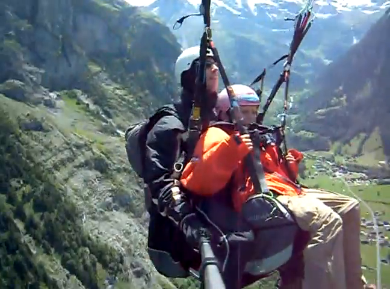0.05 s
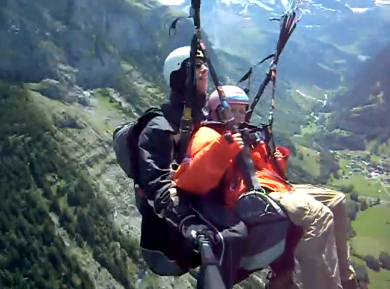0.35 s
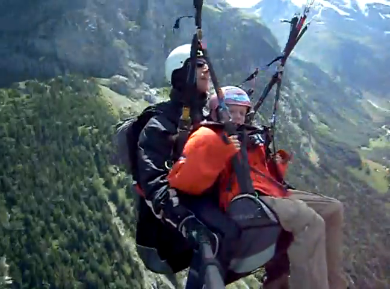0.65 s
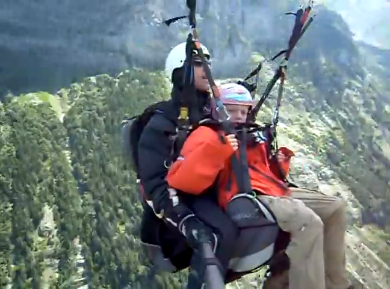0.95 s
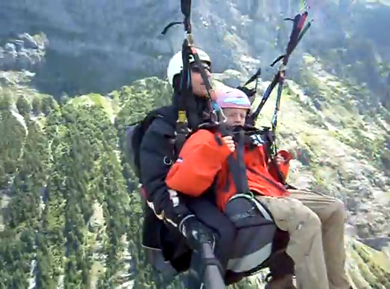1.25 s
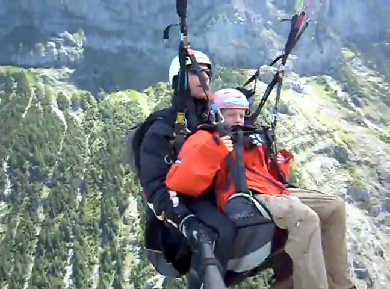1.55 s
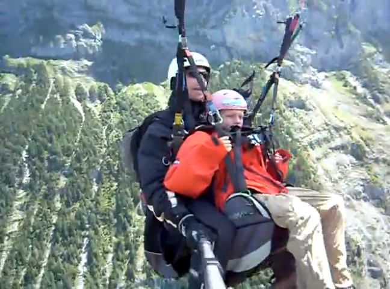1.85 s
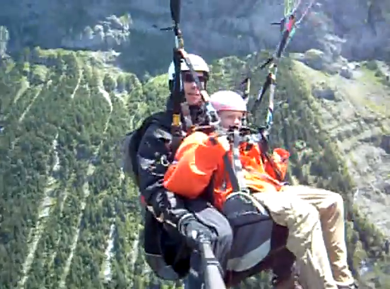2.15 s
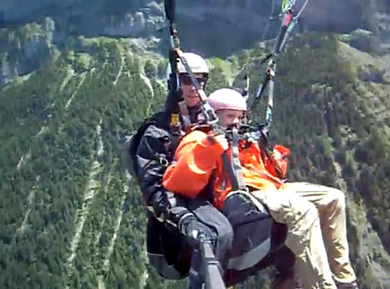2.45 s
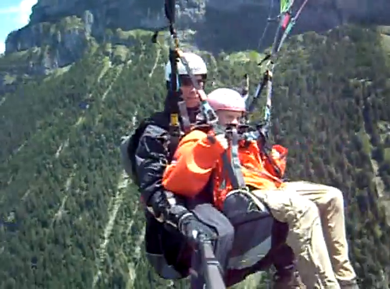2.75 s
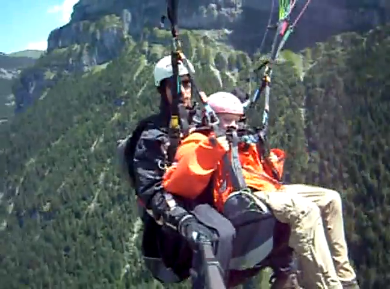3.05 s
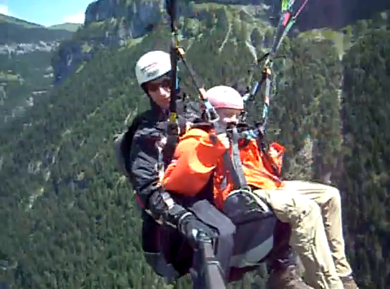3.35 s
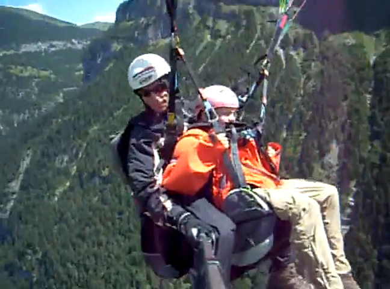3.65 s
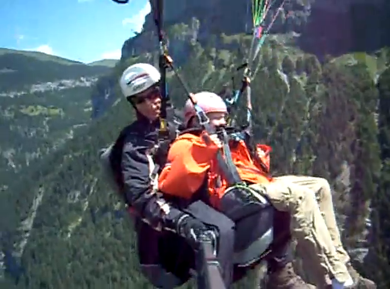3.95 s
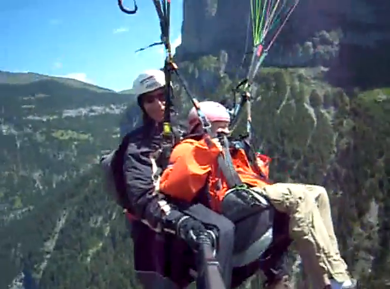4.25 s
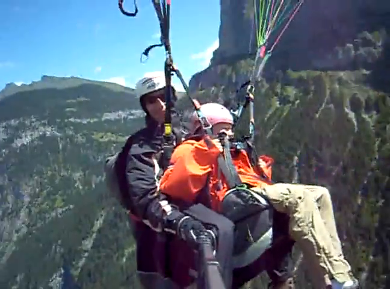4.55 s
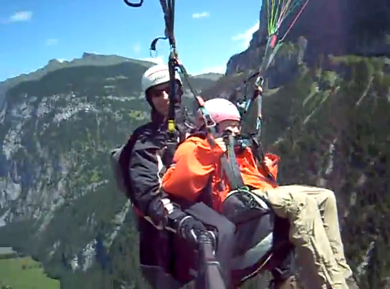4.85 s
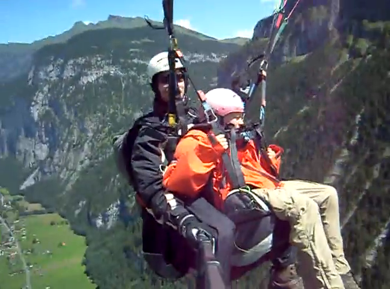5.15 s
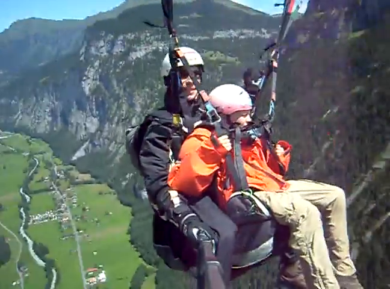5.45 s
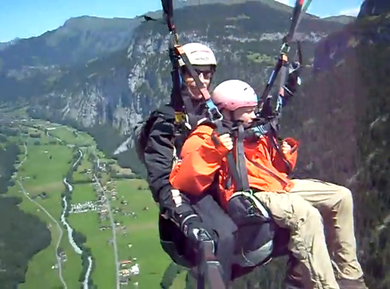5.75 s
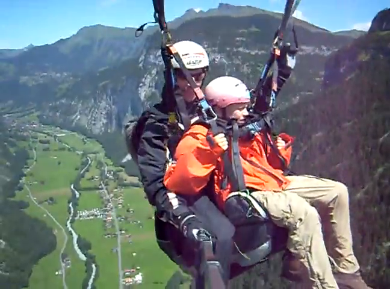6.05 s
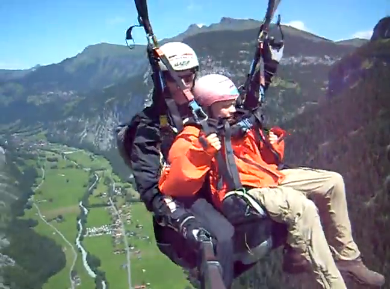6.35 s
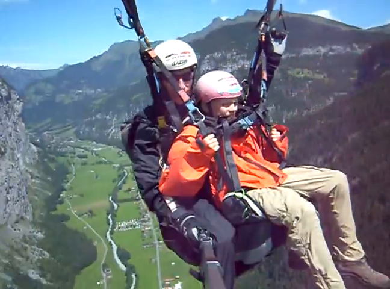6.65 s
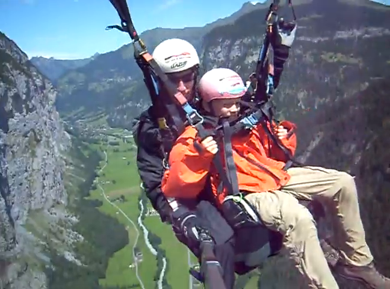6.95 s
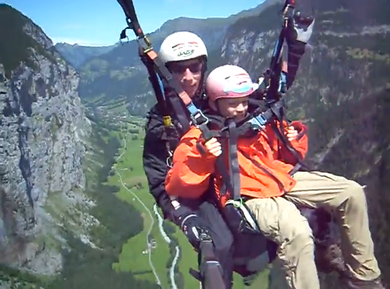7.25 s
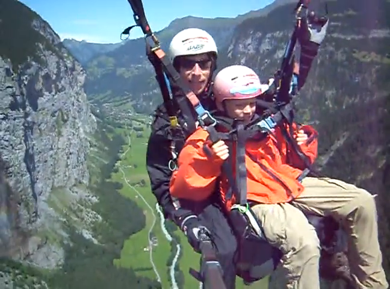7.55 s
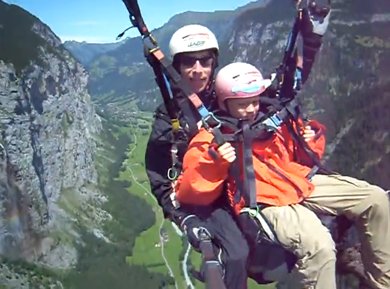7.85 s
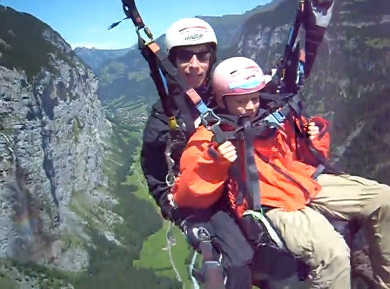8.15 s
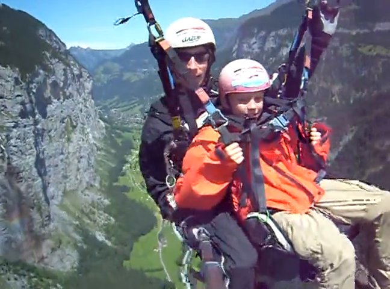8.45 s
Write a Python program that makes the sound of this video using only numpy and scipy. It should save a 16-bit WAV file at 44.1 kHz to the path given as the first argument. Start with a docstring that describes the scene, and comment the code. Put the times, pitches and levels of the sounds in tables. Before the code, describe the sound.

Low wind buffets a microphone held out on a pole from a paraglider high over a valley. Air rushes over cloth and harness, with a faint airy whistle from the lines and a few soft thuds. Midway, one strong gust roars, cracking and spitting on the microphone. The wind then drops, and short rough puffs hit the microphone, thickest near the end.

```python
"""Low wind buffets a camera microphone, held out on a pole from a paraglider swinging through turns.
Air rushes over cloth and harness; lines and pole shed vortices and sing faintly with the airspeed.
Midway one long gust roars, cracking and spitting at the microphone port.
Single eddies hit the port as short, rough puffs, most often in the slower air afterwards."""
import sys
import numpy as np
from scipy.fft import rfft, irfft, next_fast_len
from scipy.io import wavfile
from scipy.ndimage import map_coordinates

SR = 44100
rng = np.random.default_rng(int(sys.argv[2]) if len(sys.argv) > 2 else 0)


def master(y):
    """Save y as 16-bit WAV."""
    cut = np.clip(np.atleast_2d(y).T, -1, 1)
    pcm = np.round(cut * 32767)  # scale
    wavfile.write(sys.argv[1], SR, pcm.astype(np.int16))


N = 378819
TIME = np.arange(N) / SR
CRUISE_M_PER_S = 10

# glider gains speed in the turn, then slows: time_s, speed_m_per_s
AIRSPEED = [(0, 9.3), (.6, 10.37), (1.6, 10.42), (2.5, 10.57), (3.3, 9.8), (3.9, 9.7), (5.3, 9.16),
            (6.2, 8.2), (6.8, 8.05), (7.5, 7.27), (8.59, 7.1)]


def amp(db):
    """Decibels to gain."""
    return 10 ** (np.asarray(db) / 20)


def unit(x):
    """Scale to rms 1."""
    return x / np.sqrt(np.mean(x ** 2) + 1e-20)


def curves(rows):
    """One value per sample for each column after time_s."""
    time_s, *columns = np.transpose(rows)
    return [np.interp(TIME, time_s, column) for column in columns]


def swell(middle_s, half_s):
    """Bell in time, peak 1."""
    return np.exp(-((TIME - middle_s) / half_s) ** 2)


def wobble(rate_hz):
    """Smooth, bounded random curve through knots at rate_hz."""
    knots = np.clip(rng.standard_normal(int(N * rate_hz / SR) + 4), -2, 2)
    return map_coordinates(knots, [TIME * rate_hz])


def filtered(x, response):
    """x through a gain given as a function of frequency."""
    size = next_fast_len(N + 8192)
    return irfft(rfft(x, size) * response(np.fft.rfftfreq(size, 1 / SR)), size)[:N]


def coloured(x, spectrum):
    """x through a spectrum of rows freq_hz, gain_db."""
    freq_hz, gain_db = np.transpose(spectrum)
    return filtered(x, lambda f: amp(np.interp(np.log(f + 1), np.log(freq_hz), gain_db)))


def noise(spectrum):
    """Coloured noise, rms 1."""
    return unit(coloured(rng.standard_normal(N), spectrum))


def crackle(spectrum, rate_hz, spread_db):
    """Coloured pressure jumps of uneven size at random moments, rms 1."""
    size = amp(spread_db * np.minimum(rng.standard_normal(N), 2)) * rng.choice([-1, 1], N)
    jumps = size * (rng.random(N) < rate_hz / SR)
    return unit(coloured(jumps, spectrum))


def flow():
    """Buffet and turbulence at the port in dB; both sink in a lull."""
    # airflow strength: time_s, buffet_db, turbulence_db
    strength = [(0, -32.5, -36), (1.0, -32.5, -32), (1.8, -26, -31.5), (2.55, -27, -30.5),
                (3.15, -28.5, -34.5), (3.8, -28, -33.5), (4.2, -25.5, -22.5), (4.45, -26.5, -14),
                (4.7, -27.5, -15), (5.0, -24.5, -22.5), (5.33, -26.5, -30.5), (5.44, -33.5, -37),
                (5.8, -37, -34.5), (6.1, -38, -42), (6.75, -36.5, -40.5), (7.3, -41.5, -37),
                (8.0, -39, -32), (8.59, -41.5, -37.5)]
    # flow briefly leaves the port: middle_s, half_s, depth_db
    lulls = [(7.582, 0.11, -11), (8.225, 0.068, -12)]
    lull_db = sum(depth_db * swell(middle_s, half_s) for middle_s, half_s, depth_db in lulls)
    return [db + lull_db for db in curves(strength)]


def port_wind():
    """Wind on the microphone port: large eddies thump, small ones roar, the smallest crackle."""
    # low buffet spectrum: freq_hz, gain_db
    buffet_spectrum = [(20, -53), (45, -12), (65, -10.5), (88, -3.5), (150, -1), (230, -4.5), (350, -9),
                       (600, -22), (1500, -77), (4000, -90)]
    # mid turbulence spectrum: freq_hz, gain_db
    turbulence_spectrum = [(25, -35), (120, -12), (220, -0.5), (300, 0), (400, -0.5), (520, -0.5),
                           (750, -4.5), (1100, -10), (1600, -17), (2400, -26.5), (3300, -39.5),
                           (4200, -45.5), (6000, -48.5), (10000, -50)]
    # spectrum of the smallest eddies: freq_hz, gain_db
    crackle_spectrum = [(300, -18), (1200, 21.5), (2500, 3), (3400, 5), (4600, -16), (7000, -8.5),
                        (10500, -10.5)]
    buffet_db, turbulence_db = flow()
    speed_m_per_s, = curves(AIRSPEED)
    # slow air clings to the housing and breaks away by turns, so it flutters more
    flutter_db = np.interp(speed_m_per_s, [8.2, 9.1], [2.1, 1.3]) * wobble(rate_hz=36)
    buffet = amp(buffet_db + 2.5 + flutter_db) * noise(buffet_spectrum)
    swirl = noise(turbulence_spectrum)
    low_swirl = filtered(swirl, lambda f: 1 / (1 + (f / 1500) ** 4))
    spurts = wobble(rate_hz=330)
    large = low_swirl * unit(amp(2.25 * spurts))
    small = (swirl - low_swirl) * unit(amp(5.6 * spurts))
    smallest = amp(-24) * crackle(crackle_spectrum, rate_hz=320, spread_db=6)
    # a strong gust tears the flow into more small eddies
    tear = amp(np.interp(turbulence_db, [-28, -15], [-0.8, 1.2]))
    roar = large + tear * (small + smallest)
    return buffet + amp(turbulence_db + 1.85 + flutter_db) * roar


def slipstream():
    """Rush over cloth and harness, narrower hiss at the camera's edges; both grow with airspeed."""
    # rush spectrum: freq_hz, gain_db
    rush_spectrum = [(200, 5), (800, -4.5), (1600, -2.5), (2300, -1.5), (3200, -10.5), (4500, -13),
                     (6200, -19), (7700, -18), (10000, -25.5)]
    edge_spectrum = [(1000, -30), (2500, 1), (3400, 4), (4200, -11), (8000, -38)]
    db_per_doubling = 24.5
    speed_m_per_s, = curves(AIRSPEED)
    speed_db = db_per_doubling * np.log2(speed_m_per_s / CRUISE_M_PER_S)
    swish_db = 10 * swell(middle_s=0.5, half_s=0.33)  # air briefly catches an edge
    edge = amp(-61.5 + swish_db) * noise(edge_spectrum)
    rush = amp(-43.5) * noise(rush_spectrum)
    eddy_gain = unit(amp(wobble(rate_hz=6.5)))
    return amp(speed_db) * (rush + edge) * eddy_gain


def whistle(pitch_hz, width_ratio):
    """Narrow noise band on a moving pitch, rms 1."""
    phase = 2 * np.pi * np.cumsum(pitch_hz) / SR
    half_width_hz = width_ratio * np.mean(pitch_hz)
    drift = [filtered(white, lambda f: 1 / (1 + (f / half_width_hz) ** 2))
             for white in rng.standard_normal((2, N))]
    return unit(drift[0] * np.cos(phase) + drift[1] * np.sin(phase))


def line_song():
    """Lines and pole shed vortices at a rate set by speed over diameter: airy whistles, low flutter."""
    # thin line, thick line, camera pole:
    # diameter_m, width_ratio, cruise_db, db_per_doubling, overtone_db, broadside_db
    cylinders = [(.00101, 0.12, -48, 21, -17, -1.5), (.00131, 0.18, -50.5, 22, -18, 8),
                 (.023, 0.11, -42, 29, -6.5, -11)]
    strouhal = .2
    speed_m_per_s, = curves(AIRSPEED)
    doublings = np.log2(speed_m_per_s / CRUISE_M_PER_S)
    broadside = swell(middle_s=0.5, half_s=0.59)  # harness swings across the flow
    song = np.zeros(N)
    for diameter_m, width_ratio, cruise_db, db_per_doubling, overtone_db, broadside_db in cylinders:
        pitch_hz = strouhal * speed_m_per_s / diameter_m
        tone = whistle(pitch_hz, width_ratio) + amp(overtone_db) * whistle(2 * pitch_hz, width_ratio)
        song += amp(cruise_db + db_per_doubling * doublings + broadside_db * broadside) * tone
    return song


def rumble():
    """Steady deep rumble from handling the pole."""
    # rumble spectrum: freq_hz, gain_db
    spectrum = [(15, -3.5), (40, 6), (70, 1), (130, -14), (400, -45)]
    return amp(-48) * noise(spectrum)


def stray_eddies(count):
    """Weak chance eddies that follow the turbulence level: start_s, length_s, level_db, rasp_db."""
    ceiling_db, rasp_db = -30.5, -18
    turbulence_db = flow()[1]
    rows = []
    for when, size, strength in rng.random((count, 3)):
        length_s = .014 * (.5 + size)
        level_db = min(turbulence_db[int(when * N)] + 7.5 * (.5 + strength), ceiling_db)
        rows.append((when * N / SR, length_s, level_db, rasp_db))
    return rows


def puffs():
    """Single eddies blow into the port: soft ones thud, hard ones bark with a ragged rasp."""
    # strong eddies: start_s, length_s, level_db, rasp_db (relative to level_db)
    strong_eddies = [(.369, 0.0093, -21.5, -26), (1.209, 0.017, -16.5, -17), (1.24, 0.026, -21.5, -20),
                     (1.462, 0.011, -19, -24.5), (2.527, 0.044, -21.5, -28), (2.919, 0.0096, -21, -25),
                     (4.079, 0.016, -19.5, -20.5), (4.266, 0.012, -12.5, -16.5),
                     (4.925, 0.0049, -16, -13.5), (5.293, 0.0055, -26, -9.5), (5.324, 0.0065, -18.5, -17.5),
                     (5.769, 0.023, -26.5, -29), (5.917, 0.0098, -22, -30), (6.124, .014, -29.5, -32),
                     (6.156, .036, -30, -25), (6.373, 0.024, -21, -23), (6.409, 0.011, -25, -30),
                     (7.045, 0.014, -26, -31), (7.138, 0.024, -22.5, -16), (7.168, 0.0057, -26, -20),
                     (7.286, 0.0077, -26.5, -14), (7.331, 0.012, -22.5, -8), (7.379, 0.026, -20, -11.5),
                     (7.432, 0.0083, -24, -17), (7.449, 0.0087, -26, -11), (7.723, .012, -19, -18),
                     (7.827, 0.014, -28, -17), (7.9, 0.014, -15, -5.5), (7.927, 0.024, -12, -8),
                     (7.967, 0.024, -12.5, -9), (7.993, 0.0071, -14.5, 2.5), (8.005, 0.022, -13, -9.5),
                     (8.044, 0.0055, -17.5, -22), (8.089, 0.0032, -20, -2), (8.102, .01, -22, -15),
                     (8.328, 0.0073, -13.5, -10), (8.416, 0.0096, -22, -9.5)]
    # soft eddy spectrum: freq_hz, gain_db
    thud_spectrum = [(25, 3.5), (120, -3.5), (300, 5), (480, 2.5), (750, -4.5), (1200, -13), (2000, -25.5),
                     (4000, -74), (10000, -68)]
    # hard eddy spectrum: freq_hz, gain_db
    bark_spectrum = [(25, -24), (120, -14.5), (300, -7.5), (500, -2.5), (740, -2.5), (980, -5.5),
                     (1700, -11.5), (3000, -50), (6000, -60), (11000, -48)]
    # rasp spectrum: freq_hz, gain_db
    rasp_spectrum = [(300, -25), (900, -1), (1600, 6.5), (2500, 2.5), (3300, -4.5), (4300, -12.5),
                     (5500, -19.5), (10000, -25)]
    rise_power, fall_power = 7, 3.9  # a puff arrives faster than it leaves
    soft, hard, scrape = np.zeros((3, N))
    for start_s, length_s, level_db, rasp_db in strong_eddies + stray_eddies(count=18):
        # flat while the eddy covers the port, steep on either side
        off_centre = np.abs(2 * (TIME - start_s) / length_s - 1)
        steepness = np.where(TIME < start_s + length_s / 2, rise_power, fall_power)
        blow = amp(level_db) / (1 + off_centre ** steepness)
        hardness = np.interp(rasp_db, [-22, -8], [0, 1])
        soft += blow * np.sqrt(1 - hardness)
        hard += blow * np.sqrt(hardness)
        scrape += blow * amp(rasp_db)
    ragged = wobble(rate_hz=600)
    thud = amp(-1.06) * soft * noise(thud_spectrum)
    bark = amp(-1.04) * hard * noise(bark_spectrum)
    rasp = scrape * noise(rasp_spectrum)
    return (thud + bark) * unit(amp(1.2 * ragged)) + rasp * unit(amp(3 * ragged))


def cracks():
    """Flow tears off the port: pressure steps that die in milliseconds, a thin tick on top."""
    # flow separations: start_s, level_db, tick_db (relative to level_db)
    separations = [(1.5534, -34, -2), (4.4148, -13, -25), (4.501, -13, -22), (4.598, -10, -25),
                   (4.6047, -11, -18), (4.6657, -10.5, -16), (4.8927, -10, -34), (5.2454, -35, -1)]
    # crack spectrum: freq_hz, gain_db
    crack_spectrum = [(100, -8), (600, 13.5), (2000, 15), (3300, 6), (4600, -4), (7000, -47), (11000, -60)]
    # tick spectrum: freq_hz, gain_db
    tick_spectrum = [(1000, -25), (4000, 4), (7000, -9), (11000, 11)]
    t60_s = .012
    snap, tick = np.zeros((2, N))
    age_s = np.arange(SR // 50) / SR
    for start_s, level_db, tick_db in separations:
        start = round(start_s * SR)
        decay = amp(level_db - 60 * age_s / t60_s)
        snap[start:start + len(decay)] += decay
        tick[start:start + len(decay)] += decay * amp(tick_db)
    return amp(-4.6) * snap * noise(crack_spectrum) + amp(-2.0) * tick * noise(tick_spectrum)


def spits():
    """Strong turbulence overloads the port in sparse, bright spits."""
    # spit spectrum: freq_hz, gain_db
    spectrum = [(300, -12), (1200, 11), (3000, 2.5), (4200, -10), (6000, -12.5), (11000, -15)]
    at_gust_peak_db, growth_db_per_db = -38.5, 0.93
    turbulence_db = flow()[1]
    level_db = at_gust_peak_db + growth_db_per_db * (turbulence_db - turbulence_db.max())
    return amp(level_db) * crackle(spectrum, rate_hz=100, spread_db=4.5)


def scene():
    """All the moving air, over deep rumble and microphone hiss; mono."""
    floor = rumble() + amp(-61.5) * rng.standard_normal(N)
    return (port_wind() + puffs() + cracks() + spits() + slipstream() + line_song() + floor)[None]


def record(dry):
    """The camera clips the strongest peaks and cuts off steeply at its band limit."""
    full_scale, top_hz = .71, 10900
    clipped = np.clip(dry[0], -full_scale, full_scale)
    return filtered(clipped, lambda f: 1 / np.sqrt(1 + (f / top_hz) ** 58))[None]


dry = scene()
out = record(dry)
master(out)
```